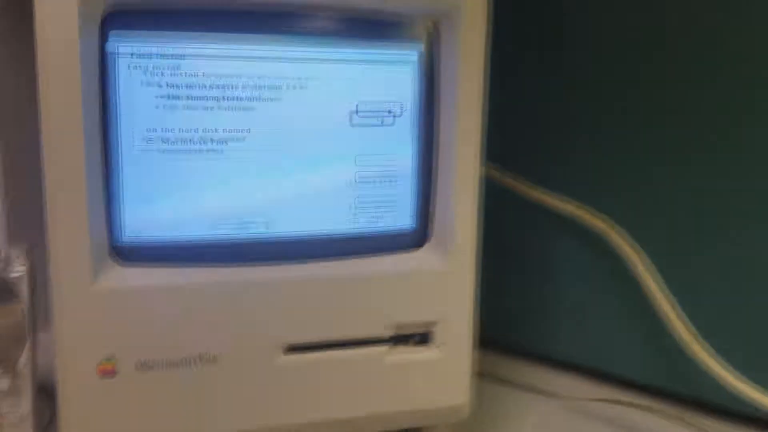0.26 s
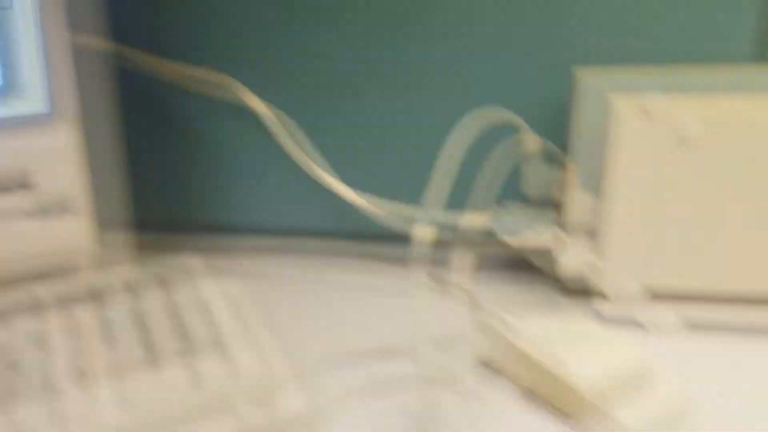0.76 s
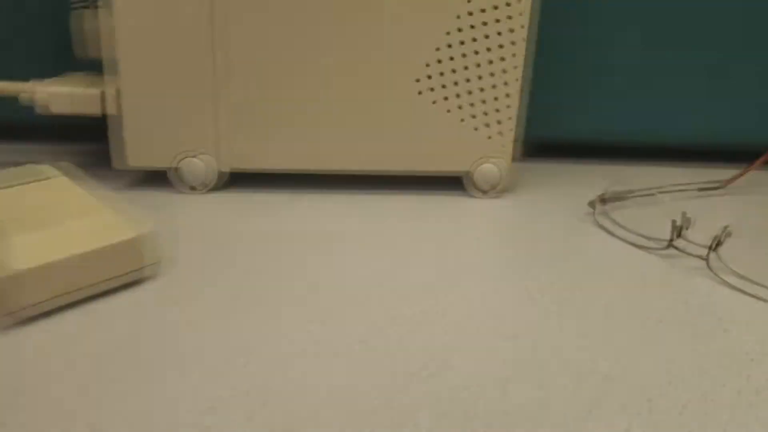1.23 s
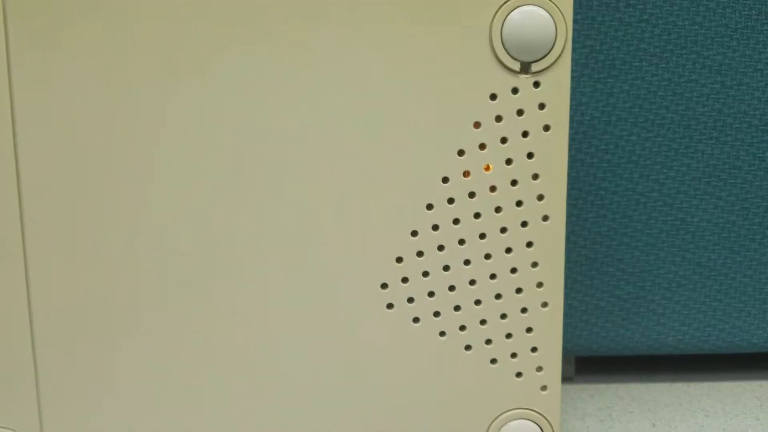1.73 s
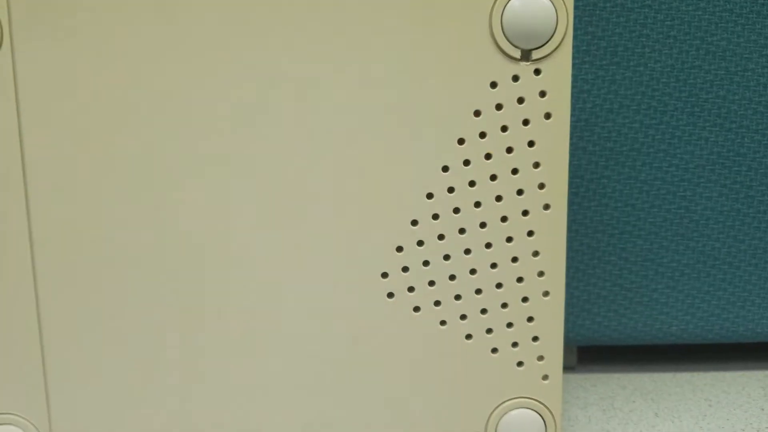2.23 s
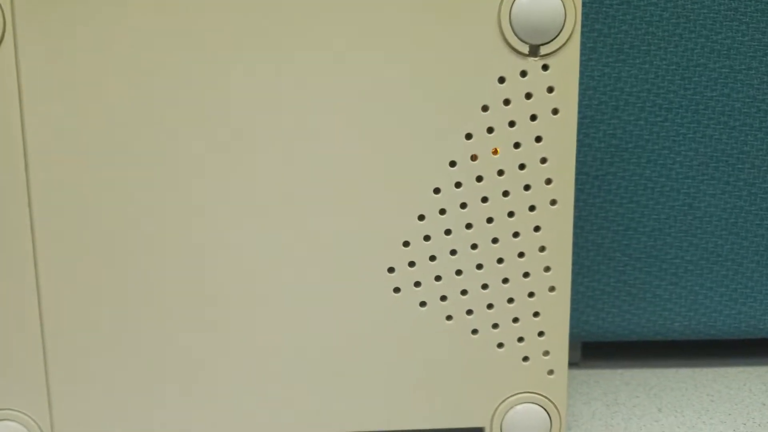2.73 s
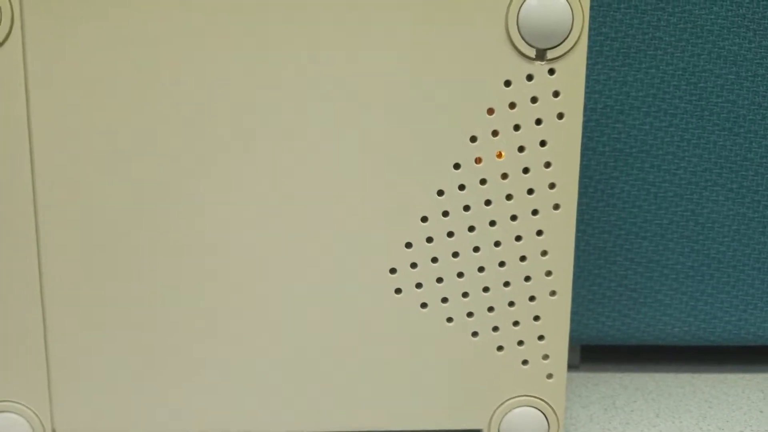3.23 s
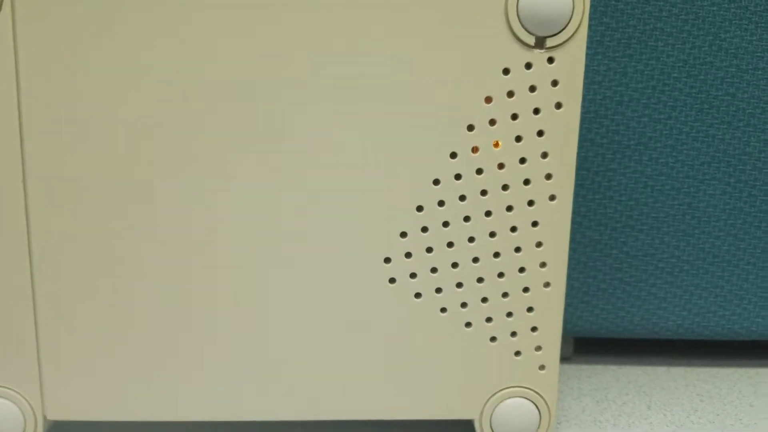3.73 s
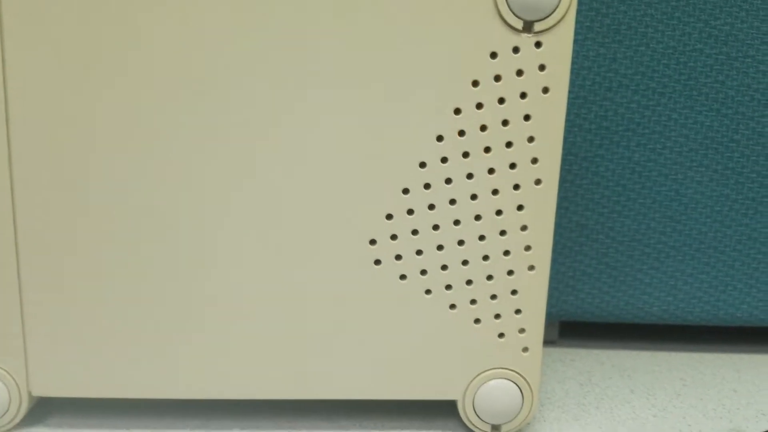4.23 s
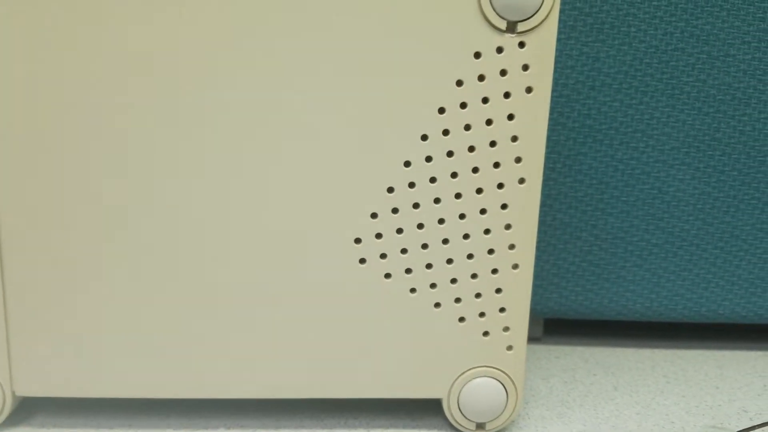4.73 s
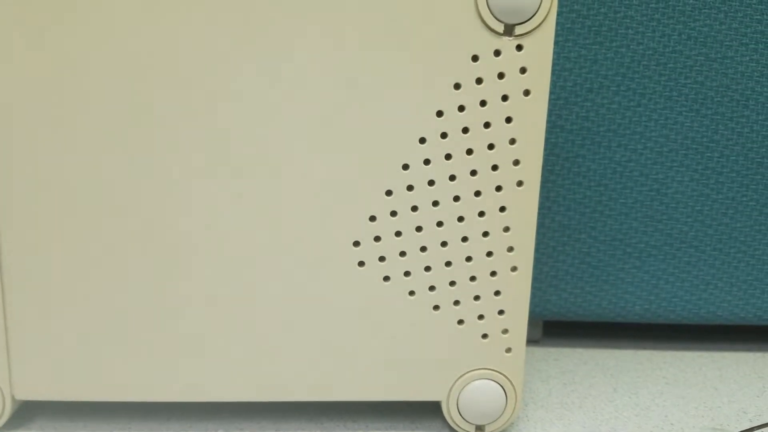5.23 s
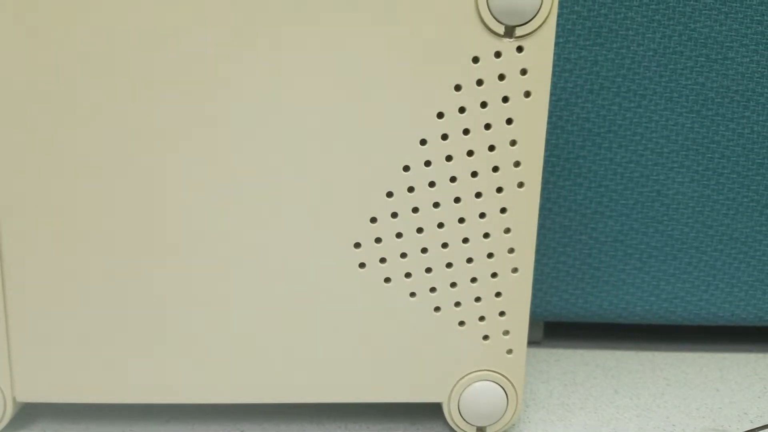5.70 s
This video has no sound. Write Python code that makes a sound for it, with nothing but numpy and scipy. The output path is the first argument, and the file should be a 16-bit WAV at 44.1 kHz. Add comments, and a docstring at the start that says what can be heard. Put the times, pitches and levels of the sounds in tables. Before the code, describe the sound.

An old desktop computer and its disk drive hum low and unsteadily in a small office. Close up, fingers slide and knock on the camera's plastic case, busiest in the first second and a half with one heavy thump at one second. A hard double bump follows after two seconds, then a cluster of loud snaps just after three. Soft rubs fade out and the hum drops away near five. Stereo microphones on the handled camera.

```python
"""Handling a camera beside a humming computer

A desktop computer and its disk drive hum on an office desk, heard from a hand-held camera: wavering tones and noise.
Fingers rub, knock and click on the plastic case as it swings toward the drive; the case creaks under them.
Slides are shaped noise; knocks, clicks and creaks are short pushes and snaps that set plastic and air ringing.
A narrow, slightly buzzing hiss at the left microphone shifts in pitch when the grip changes."""
import sys
import numpy as np
from scipy import signal
from scipy.fft import rfft, irfft
from scipy.io import wavfile

SR = 44100
rng = np.random.default_rng(int(sys.argv[2]) if len(sys.argv) > 2 else 0)


def to_wav(sig):
    """Store sig (one row per channel, or 1-D mono) as 16-bit WAV at the path in sys.argv[1].

    Samples outside -1..1 are clipped; the rate is SR.
    """
    pcm = np.clip(np.atleast_2d(sig), -1, 1) * 32767
    pcm = np.round(pcm).astype(np.int16)
    wavfile.write(sys.argv[1], SR, pcm.T)  # frames by channels


N = 262836  # samples, about 6 s
TIME, FREQ = np.arange(N) / SR, np.fft.rfftfreq(N, 1 / SR)  # s, Hz
BRIEF = np.arange(4096) / SR  # s, time within one short knock or click
BRIEF_FREQ = np.fft.rfftfreq(len(BRIEF), 1 / SR)  # Hz

# The finger gap in each grip, held until the next one. Level and drift are for the main resonance, before the
# swing and flicker; the upper resonance and broad skirt are relative to it.
# Columns: start t/s, level/dB, drift/(dB/s), centre f/Hz, width/Hz, flank steepness, upper level/dB, skirt level/dB
GRIPS = [(-.1, -58, -3.5, 6270, 1160, 2.1, -0.5, -0.5), (1.24, -63.5, -13.5, 6240, 888, 1.63, 1, -3),
         (2.235, -74, -3, 6140, 900, 1.9, 6.5, 8), (2.348, -64, -0.5, 4000, 1990, 4.7, -27, -21),
         (3.246, -68, -7.5, 3100, 900, 2.1, -29, -0.5), (3.594, -65, -2.5, 1445, 540, 2.17, -12.5, -16),
         (5.082, -78, -3, 3240, 1400, 2.5, -35, 0.5), (5.78, -78, 31.5, 3730, 1000, 2.6, -34, 0)]
# Finger slides on the case; levels hold before each slide is faded in and out.
# Columns: middle t/s, length/s, left level/dB, right level/dB
SLIDES = [(.25, .5, -61.5, -60.5), (0.279, 0.052, -44.5, -61), (0.513, 0.074, -49.5, -44),
          (0.55, 0.021, -44, -41), (0.652, 0.0244, -53, -46), (0.923, 1.53, -55, -55.5),
          (0.886, 0.11, -46, -42.5), (1.014, 0.049, -34.5, -54), (1.136, .1, -40, -43),
          (1.284, 0.1, -45, -52), (1.34, .07, -46.5, -45.5), (1.61, 0.057, -54.5, -56.5),
          (1.756, 0.096, -49.5, -49.5), (3.208, 0.47, -53.5, -54.5), (3.637, 0.15, -74.5, -49),
          (3.752, 0.092, -57, -60), (3.876, .14, -42, -53), (4.135, .17, -49, -57),
          (4.636, 0.23, -63.5, -67)]


def amp(db):
    """Turn decibels into a plain multiplier."""
    return 10 ** (np.asarray(db) / 20)


def unit(x):
    """Scale a sound to an average (RMS) strength of 1."""
    return x / np.sqrt(np.mean(x ** 2) + 1e-30)


def read(points, hz):
    """Read a curve between its points, along a logarithmic frequency scale."""
    f, value = np.transpose(points)
    return np.interp(np.log(hz + 1), np.log(f), value)


def add(mix, s, sound):
    """Mix in a sound at time s, cutting off what runs past the end."""
    start = max(round(s * SR), 0)
    part = mix[:, start:][:, :sound.shape[1]]
    part += sound[:, :part.shape[1]]


def drift(rate_hz):
    """Random motion of unit size; a lower rate makes it slower."""
    smooth = np.exp(-(FREQ / rate_hz) ** 2)
    return unit(irfft(rfft(rng.standard_normal(N)) * smooth, N))


def air(spectrum):
    """Coloured noise, partly alike at both microphones in the bass and separate higher up."""
    # How alike left and right are. Columns: f/Hz, correlation
    likeness = [(40, .7), (120, 0.68), (300, 0.8), (640, 0), (1400, 0), (16000, 0)]
    a, b = rfft(rng.standard_normal((2, N)))
    same = np.clip(read(likeness, FREQ), -1, 1)
    left_right = np.array([a, same * a + np.sqrt(1 - same ** 2) * b])
    return unit(irfft(left_right * amp(read(spectrum, FREQ)), N))


def resonate(x, hz, width_hz, steepness):
    """A resonance lets through a band around its centre, here at unit level."""
    distance = abs(2 * (FREQ - hz) / width_hz)
    return unit(irfft(rfft(x) / (1 + distance ** steepness), N))


def ring(hz, decay_s, quality=9):
    """A short, dying tone whose phase wanders, so it is slightly unsteady."""
    wander = np.cumsum(rng.standard_normal(len(BRIEF))) * np.sqrt(2 * np.pi * hz / quality / SR)
    wander = signal.lfilter(*signal.butter(1, hz / quality, fs=SR), wander)
    return np.sin(2 * np.pi * hz * BRIEF + wander) * np.exp(-BRIEF / decay_s)


def snap(thin_hz, dull_hz, rattle_s, rattle=0.25, tail_db=-24, tail_s=0.012, loose_s=.0012, left_hz=7000):
    """A snap and a brief rattle, heard directly and through the modes of the plastic."""
    # Ways the plastic vibrates. Columns: f/Hz, width/Hz, level over the direct snap/dB
    plastic = [(520, 330, 9.5), (1150, 200, 2.5), (1522, 300, -0.5), (2160, 1200, 3.5), (2786, 47, -2),
               (3560, 200, -3.5)]
    jf = 1j * BRIEF_FREQ
    body = 1 + sum(amp(db) * jf * width / (jf ** 2 + jf * width + hz ** 2) for hz, width, db in plastic)
    shade = np.array([1 / (1 + jf / left_hz), np.ones(len(jf))])  # the finger dulls the left side
    chatter, ringing = rattle * rng.standard_normal((2, 2, len(BRIEF)))
    force = 1 + rfft(chatter * np.exp(-BRIEF / rattle_s))  # the 1 is the sharp snap
    # the tail is darker, and weak after a clean snap
    tail = rfft(ringing * np.exp(-BRIEF / tail_s)) / (1 + jf / 1800)
    force += amp(tail_db) * min(rattle_s / loose_s, 1) * tail
    thin, dull = jf / thin_hz, jf / dull_hz
    less_bass = thin ** 2 / (thin ** 2 + thin + 1)
    less_treble = 1 / (dull ** 2 + dull + 1) / (dull + 1)
    sound = irfft(force * body * less_bass * less_treble * shade)
    return sound / abs(sound).max(axis=1, keepdims=True)


def room(x, t60=0.14):
    """A faint, short office tail: echoes as noise that fades by 60 dB in t60 seconds."""
    t = np.arange(SR // 2) / SR
    tail = rng.standard_normal((2, len(t))) * amp(-60 * t / t60) * (t > .004)
    tail = signal.lfilter([1], [1, -.6], tail)  # softens the treble
    return signal.fftconvolve(x.mean(0)[None], tail / np.linalg.norm(tail[0]), axes=1)[:, :N]


def hum(lift_db=3, lumpy_db=2.5, loosen_s=5.08, loosen_db=-11.5, loosen_db_per_s=-4.5):
    """Wavering fan and disk tones in a desk-borne rumble; the hum drops away as the grip loosens."""
    # Hum at the camera before the lift, lumps and loosening; the last point is held. Columns: t/s, level/dB
    hum_levels = [(0.0, -44.5), (0.4, -45.5), (0.83, -43.5), (1.73, -52), (2.21, -45.5), (3.8, -41.5),
                  (4.0, -44), (4.45, -44)]
    # Colour of the rumble. Columns: f/Hz, level per Hz/dB
    rumble = [(15, -11), (30, -10), (45, 0.5), (62, 1), (85, -5), (108, -1), (140, -5), (200, -14),
              (260, -19.5), (400, -28), (700, -42), (1500, -66.5)]
    # Steady tones of the fan and the disk spindle. Columns: f/Hz, level relative to the rumble/dB
    motor_tones = [(107, -6), (61.8, -15), (247, -24)]
    out = air(rumble)
    for hz, db in motor_tones:
        turns = np.cumsum(hz * (1 + .01 * drift(5))) / SR
        tone = np.sin(2 * np.pi * turns) * (1 + .3 * drift(8))
        out = out + amp(db) * unit(tone)
    loose_s = np.maximum(TIME - loosen_s, 0)  # time since the grip loosened
    drop_db = loosen_db * np.minimum(loose_s / .02, 1) + loosen_db_per_s * loose_s
    level_db = np.interp(TIME, *np.transpose(hum_levels)) + drop_db + lift_db
    return unit(out) * amp(level_db + lumpy_db * drift(5.8))


def fan(level_db=-63, covered_db=-3.5, open_s=2.24, whine_hz=3262):
    """Steady cooling air, fainter until the hand opens at open_s, and the thin whine of the disk."""
    # Colour of the moving air. Columns: f/Hz, level per Hz/dB
    air_colour = [(40, -2.5), (200, -14.5), (300, 6.5), (390, -1), (480, 1), (600, -11.5), (750, -21.5),
                  (1000, -19), (1400, -15.5), (2400, -22.5), (3400, -20.5), (4600, -27), (9000, -29),
                  (12500, -24.5), (16000, -24)]
    # Whine of the disk as the camera passes the vent. Columns: t/s, level/dB
    whine_levels = [(1.3, -82), (1.9, -84.5), (2.9, -81), (3.5, -89.5)]
    whine = []
    for _ in range(2):  # each microphone hears its own wavering
        turns = np.cumsum(whine_hz + 9 * drift(40)) / SR
        whine.append(np.sin(2 * np.pi * turns) * (1 + 0.6 * drift(16)))
    cooling = amp(level_db + covered_db * (TIME < open_s)) * air(air_colour)
    return cooling + amp(np.interp(TIME, *np.transpose(whine_levels))) * unit(np.array(whine))


def hiss(upper_ratio=1.66, upper_widening=1.4, flicker_db=1.43, fade_s=.025,
         buzz_hz=120, buzz_db=-5.5, buzz_limit_db=-68, swing_s=1, swing_width_s=.18, swing_peak_db=8.5):
    """Noise and a little mains buzz ring in the small gap between a finger and the left microphone."""
    a, b, c = rng.standard_normal((3, N))
    cycle = rng.standard_normal(SR // buzz_hz)  # one random wave shape, repeated
    buzz = np.interp(TIME * buzz_hz, np.arange(len(cycle)) / len(cycle), cycle, period=1)
    # the hiss swells while the camera swings fastest
    swing_db = swing_peak_db * np.exp(-((TIME - swing_s) / swing_width_s) ** 2)
    left = np.zeros(N)
    ends = [grip[0] for grip in GRIPS[1:]] + [np.inf]
    for (start, db, db_per_s, hz, width, steepness, upper_db, skirt_db), end in zip(GRIPS, ends):
        gap = resonate(a, hz, width, steepness)
        gap += amp(upper_db) * resonate(b, hz * upper_ratio, width * upper_widening, steepness)
        gap += amp(skirt_db) * resonate(c, hz * 0.78, hz * 1.1, 7.4)
        level_db = db + db_per_s * (TIME - start) + swing_db
        gap *= amp(level_db)
        gap += amp(np.minimum(level_db + buzz_db, buzz_limit_db)) * resonate(buzz, hz, width, steepness)
        from_edge_s = np.minimum(TIME - start, end - TIME)
        left += gap * np.sqrt(np.clip(from_edge_s / fade_s + .5, 0, 1))  # crossfade between grips
    return np.array([amp(flicker_db * drift(25)) * left, np.zeros(N)])


def rubs(grain_db=3, patchy_db=1.0, taper=0.96, middle_dull_hz=4800, middle_db=-47.5, db_per_octave=13.5):
    """Skin sticks and slips on the case in tiny grains, made as flickering noise; firmer slides are brighter."""
    # What the case passes to each microphone. Columns: f/Hz, level per Hz/dB
    case_left = [(80, -9.5), (200, 4.5), (430, 1), (620, 5), (830, -9.5), (1150, -8), (1800, -17.5),
                 (2700, -23.5), (4000, -28), (8000, -40.5), (11000, -19.5), (16000, -33)]
    case_right = [(80, -18), (380, 3.5), (550, 6.5), (760, -1), (1200, -1.5), (1900, -4.5), (2700, -1),
                  (3800, -3), (6000, -10.5), (8500, -20), (12500, 3.5), (16000, -15)]
    out = np.zeros((2, N))
    case = amp([read(case_left, FREQ), read(case_right, FREQ)])
    slips = rng.standard_normal((2, N)) * amp(grain_db * drift(1300) + patchy_db * drift(50))
    slips = irfft(rfft(slips) * case, N)
    for s, length, left_db, right_db in SLIDES:
        start, end = max(s - length / 2, 0), s + length / 2
        firmness_db = (left_db + right_db) / 2 - middle_db
        dull_hz = middle_dull_hz * 2 ** (firmness_db / db_per_octave)
        dull = signal.butter(2, min(dull_hz, SR * .45), fs=SR, output="sos")
        stroke = signal.sosfilt(dull, slips[:, round(start * SR):round(end * SR)])
        stroke = stroke / stroke.std(axis=1, keepdims=True)
        stroke = stroke * signal.windows.tukey(stroke.shape[1], min(taper, 1))  # fade in and out
        add(out, start, amp([[left_db], [right_db]]) * stroke)
    return out


def creaks(per_s=23, level_db=0.5, spread_db=2.5, thin_hz=434, dull_hz=2400, rattle_s=.001):
    """The case ticks at random moments while a finger slides on it; levels follow the slide."""
    out = np.zeros((2, N))
    for s, length, left_db, right_db in SLIDES:
        for _ in range(round(per_s * length)):
            at = s + length * (rng.random() - .5)
            db = level_db + spread_db * (2 * rng.random() - 1)
            add(out, at, amp([[left_db], [right_db]]) * amp(db) * snap(thin_hz, dull_hz, rattle_s))
    return out


def knocks(damping=0.56):
    """A fingertip's rounded push rings the case and rocks it, pushing the two microphones opposite ways."""
    # Soft knocks; left and right are peaks of the push, and the ring is relative to them.
    # Columns: t/s, left level/dB, right level/dB, rocking f/Hz, contact hardness f/Hz, case ring level/dB
    knock_list = [(.135, -26, -46, 174, 150, -38), (0.4608, -17, -30, 44.3, 105, -6.5),
                  (0.475, -36, -20.5, 50, 500, -9.5), (0.9413, -13, -35, 202, 336, -26),
                  (1.006, -0.5, -35, 106, 344.4, -46), (1.0455, -19, -52, 148.6, 300, -12),
                  (1.1436, -21, -47, 253, 394, -34), (2.233, -10.5, -17.5, 79, 254.3, -20.5),
                  (2.2414, -10, -6, 161, 298, -17.5), (3.2654, -29.5, -16.5, 320, 260, -30),
                  (3.9497, -20, -40, 255, 282, -38), (4.5705, -23, -53, 101.3, 830, -41)]
    # Ringing of the case. Columns: f/Hz, decay/s, level within the case ring/dB
    case_modes = [(270, .01, -5.5), (590, .0045, 2.5)]
    out, lead = np.zeros((2, N)), .006  # s, room for the push to build up before its middle
    for s, left_db, right_db, rock_hz, hard_hz, ring_db in knock_list:
        rock = 1j * BRIEF_FREQ / rock_hz
        contact = np.exp(-2j * np.pi * BRIEF_FREQ * lead) / np.cosh(BRIEF_FREQ / hard_hz)
        push = irfft(contact * rock ** 2 / (rock ** 2 + damping * rock + 1))
        add(out, s - lead, np.array([[-amp(left_db)], [amp(right_db)]]) * push / abs(push).max())
        modes = np.array([sum(amp(db) * ring(hz, decay_s) for hz, decay_s, db in case_modes) for _ in range(2)])
        add(out, s, amp([[left_db], [right_db]]) * amp(ring_db) * modes)
    return out


def clicks(gap_ring_s=0.0017, gap_db=4.5, port_hz=12100, port_ring_s=0.0011, port_db=-10):
    """The plastic snaps, ringing the finger gap on the left and the open microphone port on the right."""
    # Sharp clicks; left and right are peaks of the snap. The ring is relative to them, before gap_db or port_db.
    # Columns: t/s, left level/dB, right level/dB, thin below f/Hz, dull above f/Hz, rattle/s, ring level/dB
    click_list = [(0.1494, -49, -35.5, 600, 2900, .001, -26), (0.2735, -59, -27.5, 584, 2100, .001, -15),
                  (.4596, -53, -24, 400, 5400, .0015, -5), (.4759, -43, -26.5, 470, 6460, .001, -18),
                  (0.5423, -43, -33.5, 500, 7000, 0.0027, -20), (0.646, -46, -35, 400, 6800, .001, -14),
                  (0.9393, -27.5, -26, 1500, 5500, .001, -10.5),
                  (1.007, -24.5, -46, 11000, 13100, 0.012, -27), (1.009, -21.5, -31, 300, 1220, 0.02, -40),
                  (2.232, -24.5, -27, 400, 3600, .002, 0.5), (2.2418, -34.5, -23.5, 404, 2980, .003, -5.5),
                  (2.3465, -50.5, -42, 900, 10000, 0.0037, 0), (3.073, -46, -41, 301, 1250, .001, -30),
                  (3.1843, -30, -18, 550, 2500, .0002, -16), (3.1873, -31, -8, 950, 2050, .0003, -3),
                  (3.2269, -27, -18, 1900, 3930, .0003, -28.5),
                  (3.263, -30.5, -10.5, 1220, 5240, .001, 2.5), (3.2647, -11, -5, 479, 5584, 0.0026, -28),
                  (4.5704, -69, -70, 788, 2500, .0004, -14), (4.8089, -43, -62, 300, 1450, .0006, -29),
                  (4.838, -44, -73, 312, 1520, .0006, -29), (4.9519, -45.5, -71, 405, 1730, .0006, -30)]
    out = np.zeros((2, N))
    for s, left_db, right_db, thin_hz, dull_hz, rattle_s, ring_db in click_list:
        gap_hz = [hz for start, _, _, hz, *_ in GRIPS if start <= s][-1]  # the grip held at this moment
        ports = np.array([amp(gap_db) * ring(gap_hz, gap_ring_s), amp(port_db) * ring(port_hz, port_ring_s)])
        sound = snap(thin_hz, dull_hz, rattle_s) + amp(ring_db) * ports
        add(out, s, amp([[left_db], [right_db]]) * sound)
    return out


def scene():
    """The equipment's steady sound under the handling of the camera."""
    steady = hum() + fan() + hiss()
    taps = knocks() + clicks()
    return steady + rubs() + creaks() + taps + amp(-31.0) * room(taps)


def record(dry):
    """The recorder's band limit: treble above about 15.9 kHz is cut."""
    low_pass = signal.firwin(511, 15900, window=("kaiser", 9), fs=SR)
    return signal.oaconvolve(dry, low_pass[None], "same")


dry = scene()
out = record(dry)
to_wav(out)
```